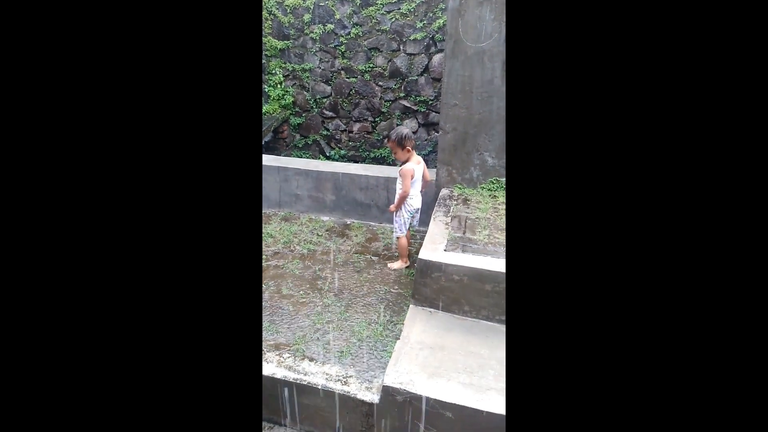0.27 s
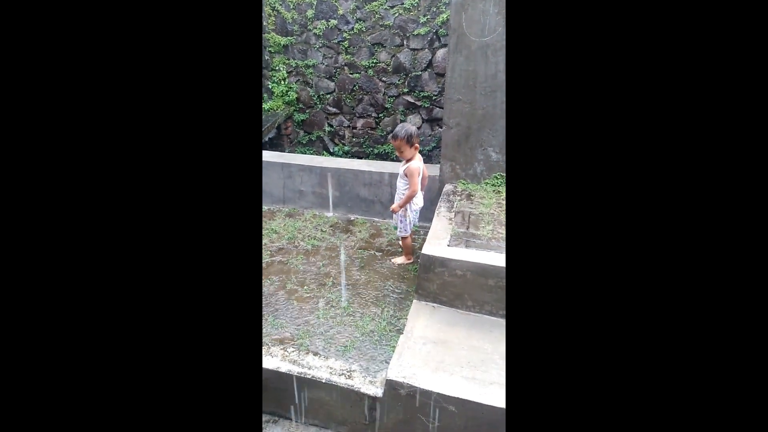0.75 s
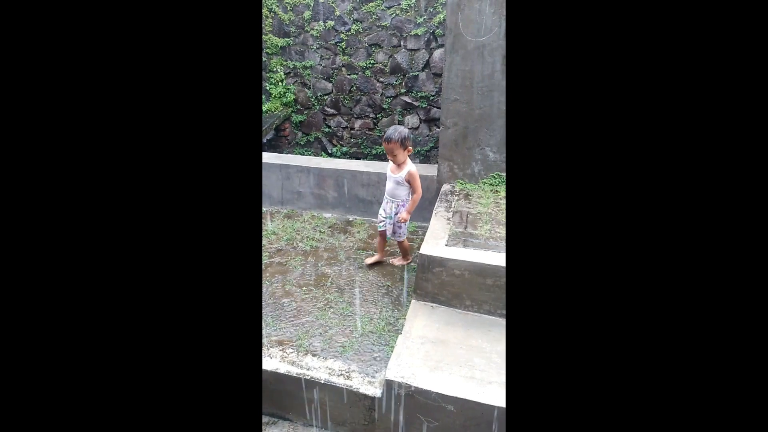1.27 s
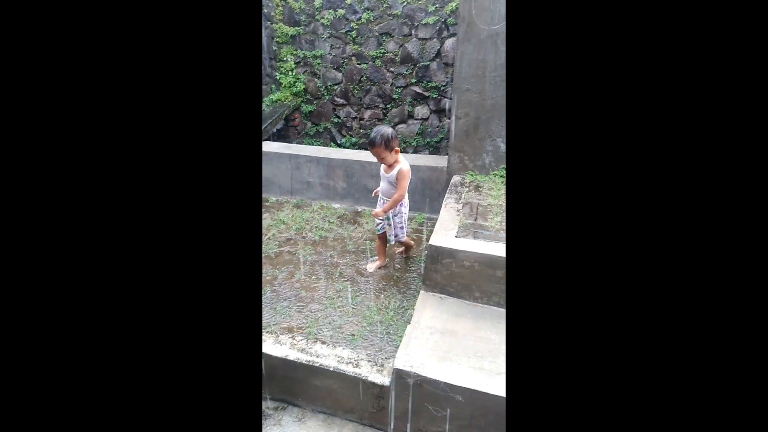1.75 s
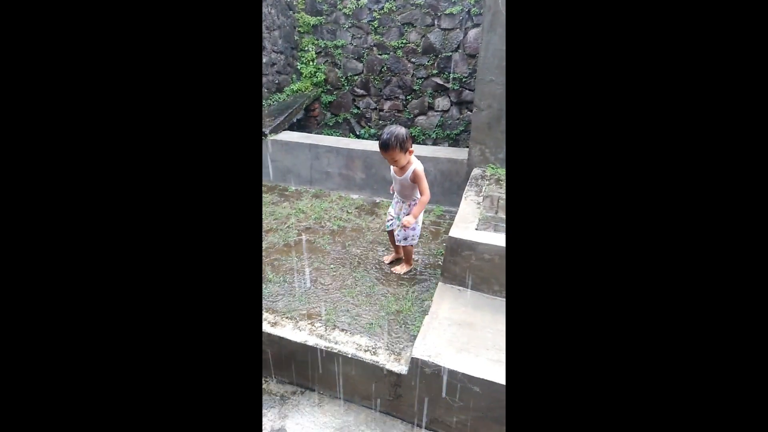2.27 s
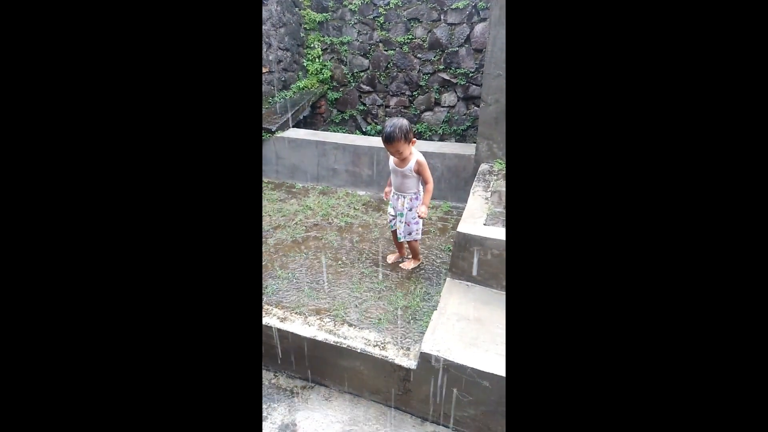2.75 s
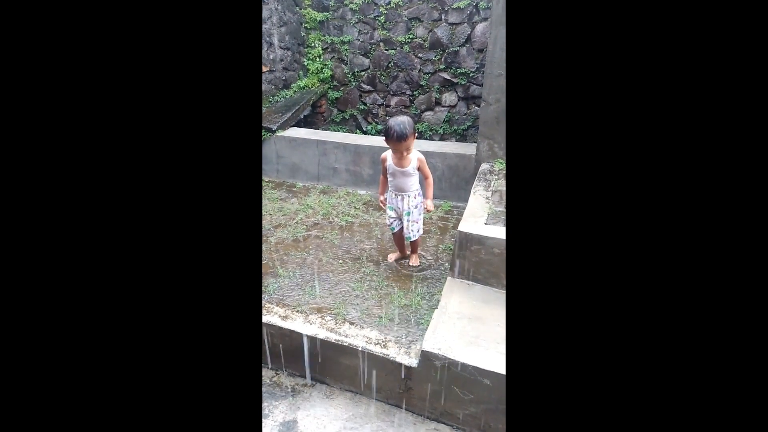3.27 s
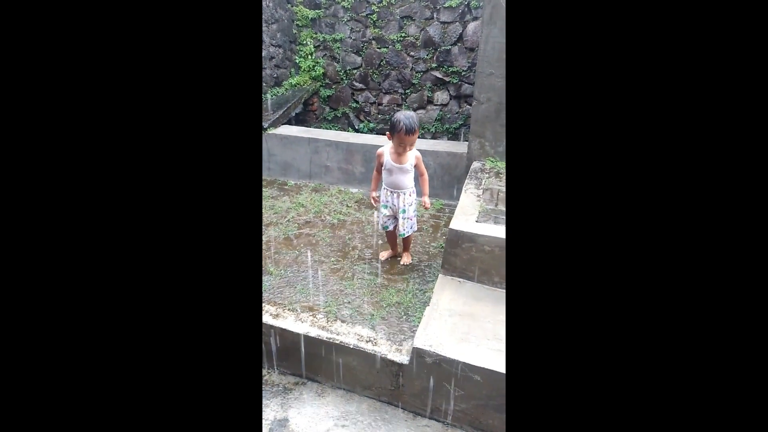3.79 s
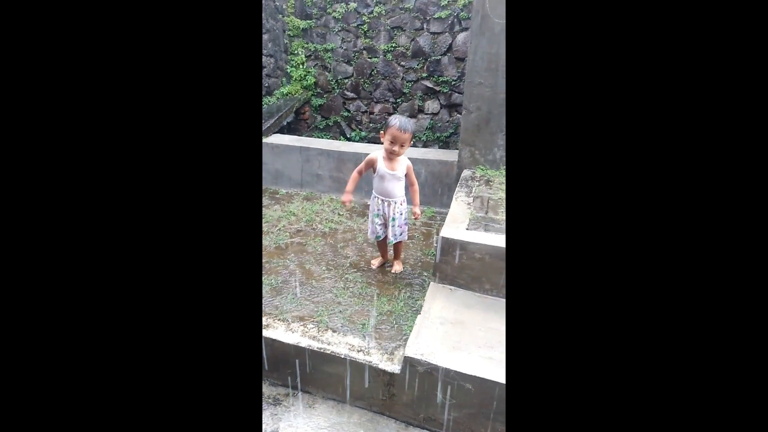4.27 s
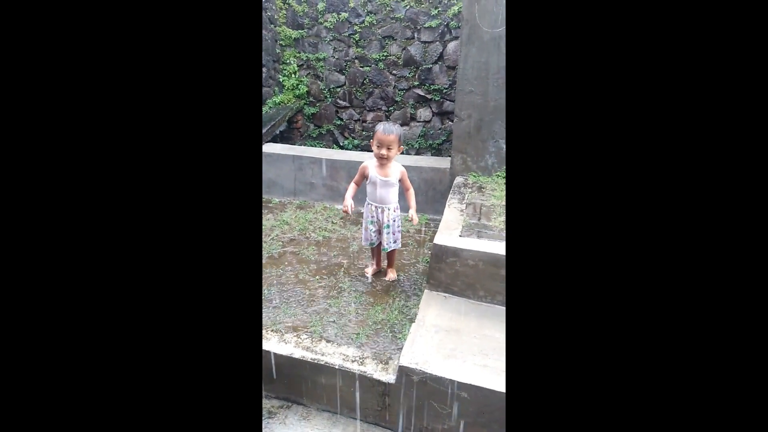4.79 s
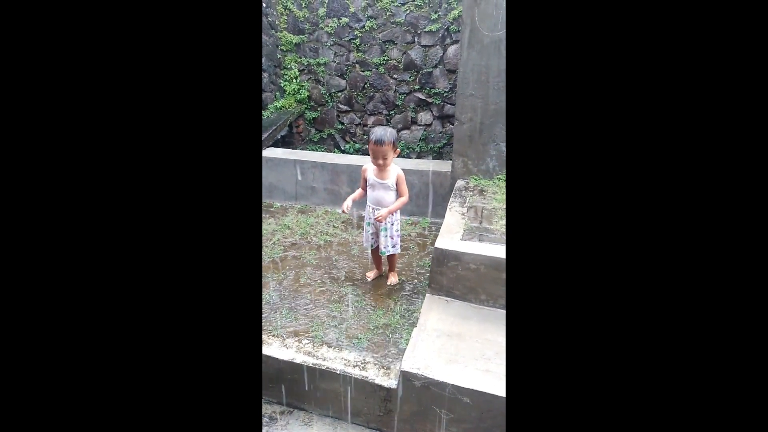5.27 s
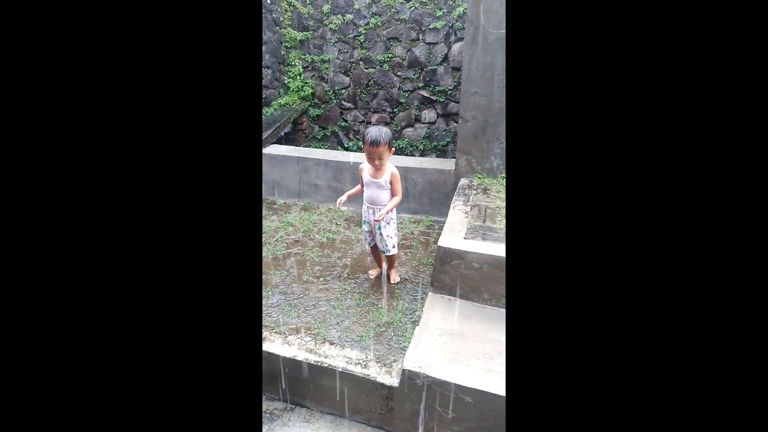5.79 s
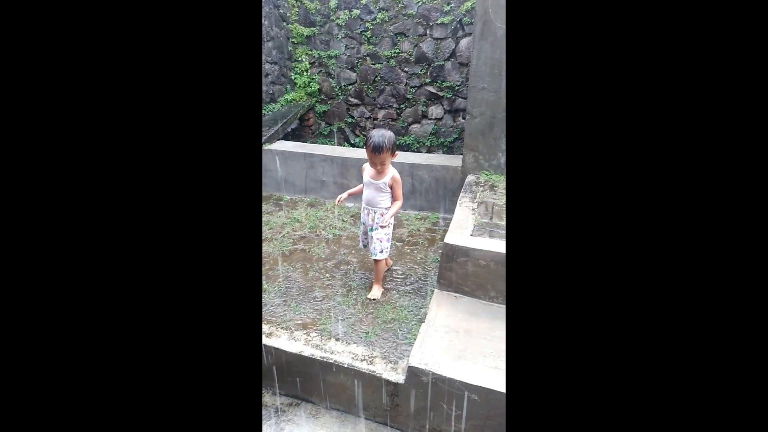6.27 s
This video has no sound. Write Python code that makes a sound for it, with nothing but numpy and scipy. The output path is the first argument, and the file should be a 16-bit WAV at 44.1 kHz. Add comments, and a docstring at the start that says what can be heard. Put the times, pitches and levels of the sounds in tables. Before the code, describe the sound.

Rainwater pours from the eaves and splashes brightly on a concrete slab, briefly letting up, while rain hisses farther off.

```python
"""Run-off from a roof splatters on concrete in uneven gushes: heavy rain in a walled yard, heard from
under the eaves. Clots of water land flat and big drops smack into the film on the slab, trapping
bubbles that ring briefly, and the walls answer. Far rain hisses over a low rumble. The gushes almost
stop just after two seconds, then build again; three faint tones sound far off near the end.
The splatter is brightest at 3-6 kHz, and the sound is wide only in the treble."""
import sys
import numpy as np
from scipy import signal
from scipy.fft import rfft, irfft, next_fast_len
from scipy.io import wavfile
from scipy.ndimage import uniform_filter1d, minimum_filter1d, map_coordinates

SR = 44100
rng = np.random.default_rng(int(sys.argv[2]) if len(sys.argv) > 2 else 0)


def int16_out(signal):
    """Quantize to a 16-bit WAV file."""
    q = np.round(np.clip(np.atleast_2d(signal).T, -1, 1) * 32767)
    wavfile.write(sys.argv[1], SR, q.astype(np.int16))


N = 288414


def amp(db):
    """Turn dB into gain."""
    return 10 ** (np.asarray(db) / 20)


def unit(x):
    """Scale to rms 1."""
    return x / np.sqrt(np.mean(x ** 2) + 1e-20)


def along(points, hz):
    """Read (Hz, value) points at hz, on a log frequency axis."""
    knots_hz, values = np.transpose(points)
    return np.interp(np.log(hz + 1), np.log(knots_hz + 1), values)


def automation(rows):
    """One curve, sample by sample, for each column after the time."""
    times, *columns = np.transpose(rows)
    return [np.interp(np.arange(N) / SR, times, column) for column in columns]


def wobble(rate):
    """A smooth random curve with rate knots a second."""
    return map_coordinates(rng.standard_normal(int(N * rate / SR) + 4), [np.arange(N) * rate / SR])


def eq(x, points):
    """Shape x with a curve of (Hz, dB) points."""
    size = next_fast_len(N + 8192)
    gain = amp(along(points, np.fft.rfftfreq(size, 1 / SR)))
    return irfft(rfft(x, size) * gain, size)[..., :N]


def hiss(patchy_db):
    """Mid and side noise, louder and softer in random patches of time and frequency."""
    spectrum = signal.stft(rng.standard_normal((2, N)), nperseg=512)[2]
    patches = uniform_filter1d(rng.standard_normal(spectrum.shape[1:]), 6, axis=0)
    patches = unit(uniform_filter1d(patches, 8, axis=1))
    return unit(signal.istft(spectrum * amp(patchy_db * patches), nperseg=512)[1][:, :N])


def bubbles(starts, gain, hz, t60, rise, samples):
    """Trapped bubbles ring as damped, rising sines, each left or right at random; gives mid and side."""
    t = np.arange(samples) / SR
    draw = rng.random((len(starts), 2))
    life = t / np.maximum(t60, 1e-4)[:, None]
    phase = 2 * np.pi * (hz[:, None] * t * (1 + rise * np.minimum(life, 1)) + draw[:, :1])
    attack = 1 - np.exp(-t * hz[:, None] / 0.8)  # swells over about a cycle
    ring = gain[:, None] * amp(-60 * life) * attack * np.sin(phase)
    at = (np.round(starts * SR).astype(int)[:, None] + np.arange(samples)).ravel()
    pan = np.sign(draw[:, 1:] - .5)
    return np.array([np.bincount(at, wave.ravel(), N + SR)[:N] for wave in (ring, ring * pan)])


def patter(starts, heft, pitch_hz, spread, cycles, heft_db, samples, share):
    """Small drops ring around pitch_hz on a bed of hiss; share is the drops' part of the power."""
    detune = np.exp(spread * rng.standard_normal(len(starts)))
    hz = np.clip(pitch_hz[(starts * SR).astype(int)] * detune, 300, 17000)
    drops = unit(bubbles(starts, amp(heft_db * heft), hz, cycles / hz, rise=0.296, samples=samples))
    return np.sqrt(share) * drops + np.sqrt(1 - share) * hiss(patchy_db=1.5)


# The gushes off the roof. Each row: time in seconds, splatter level in dB, spray level in dB.
GUSHES = [(0, -28, -31.5), (0.12, -26, -35), (0.58, -28.5, -35.5), (0.7, -23.5, -35.5), (0.93, -28.5, -38),
          (1.0, -26, -35.5), (1.2, -26, -38.5), (1.44, -41, -41.5), (1.5, -31, -36), (1.62, -31, -38),
          (1.7, -37.5, -40), (1.9, -34.5, -40), (1.96, -34.5, -34), (2.07, -29, -45), (2.11, -44.5, -43),
          (2.2, -65, -55), (2.275, -60, -50), (2.3, -36, -39), (2.52, -42, -37), (2.55, -29.5, -36),
          (2.75, -24, -36.5), (3.3, -22.5, -39), (3.45, -27.5, -38.5), (3.7, -20.5, -38.5),
          (3.87, -22.5, -35), (3.95, -25, -38), (4.12, -22.5, -35), (4.26, -25, -37), (4.42, -21.5, -35.5),
          (4.52, -23.5, -38), (4.71, -18, -35.5), (4.82, -24, -34), (4.92, -20, -35.5), (5.28, -26.5, -34),
          (5.36, -22, -33.5), (5.62, -22, -35), (5.8, -19, -36), (6.18, -23, -32), (6.33, -20.5, -35),
          (6.54, -21.5, -35.5)]
# The typical bubble in the run-off. Each row: time in seconds, pitch in Hz.
BUBBLE_PITCH = [(0, 4285), (2.2, 4310), (2.7, 4740), (4.4, 4960), (5.5, 5290), (6.54, 5300)]
# The colours of bright splatter, lower wash and airy spray. Each row: frequency in Hz, gain in dB.
SPLATTER_EQ = [(1500, -33), (2500, -22), (3300, -7), (4200, -1.5), (5100, 1), (5900, -3.5), (7000, -16.5),
               (10000, -18)]
WASH_EQ = [(700, -31), (1300, -11), (1900, -12.5), (2600, 1), (3300, 6), (4500, -31)]
SPRAY_EQ = [(4500, -6), (6500, -1), (8000, 0), (10500, -1.5), (14000, -0.5), (16000, -7)]


def run_off():
    """Roof water hits the slab: one stream of drops sounds as splatter, wash and spray at once."""
    flow_db, spray_db = automation(GUSHES)
    surge = after_clots(db=-12.5, t60=0.34)  # splatter thrown up by each clot
    splatter_db = 10 * np.log10(amp(2 * flow_db) + surge)
    surge_share = 1 - amp(2 * (flow_db - splatter_db))
    hz = automation(BUBBLE_PITCH)[0] * (1 - 0.2 * surge_share)  # fresh water traps bigger bubbles
    flutter = wobble(45) + 1.3 * wobble(110)
    starts = rng.random(size=6000) * (N - 1) / SR
    heft = np.minimum(rng.exponential(size=6000), 4)

    wet = patter(starts, heft, hz, spread=0.2185, cycles=47, heft_db=2.5, samples=384, share=0.24)
    bright = np.clip((hz - 3700) / 1800, 0, 1)  # smaller bubbles shift the whole colour up
    low, high = (unit(eq(wet, np.multiply(SPLATTER_EQ, [shift, 1]))) for shift in (.88, 1.1))
    splatter = unit((1 - bright) * low + bright * high) * amp(splatter_db + 0.91 * flutter)

    wash = patter(starts[::3], heft[::3], 0.447 * hz,
                  spread=0.28, cycles=24, heft_db=0, samples=384, share=0.16)
    spray = patter(starts, heft, 2.43 * hz,
                   spread=0.33, cycles=74, heft_db=7.5, samples=160, share=0.099)
    wash_gain = np.sqrt(after_clots(db=-20, t60=0.96)) * amp(1.9 * flutter + 0.66 * wobble(40))
    spray_gain = amp(spray_db + 1.14 * flutter + 0.51 * wobble(40))
    return splatter + wash_gain * unit(eq(wash, WASH_EQ)) + spray_gain * unit(eq(spray, SPRAY_EQ))


# The colours of the far rain and the rumble under it. Each row: frequency in Hz, gain in dB.
RAIN_EQ = [(100, -20), (150, -5), (300, -4), (600, -2.5), (1000, -4.5), (1600, -9), (4000, -6.5),
           (6000, -27), (16000, -18.5)]
RUMBLE_EQ = [(15, -48), (25, -38), (63, 6.5), (80, 6.5), (98, 7), (124, -11), (140, 1.5), (180, -6.5),
             (310, -120)]
# The swell and ebb of the rumble. Each row: time in seconds, level in dB.
RUMBLE_SWELLS = [(0.0, -52), (0.07, -52.5), (1.38, -43.5), (1.6, -51), (2.2, -46.5), (2.26, -58.5),
                 (3.71, -46), (4.86, -54.5), (6.52, -53), (6.54, -46)]


def far_rain():
    """Countless distant drops merge into a smooth hiss over a rumble."""
    flow_db, full_flow_db = automation(GUSHES)[0], -23
    rain_db = -43 + 0.11 * (flow_db - full_flow_db)  # rides gently with the gushes
    rumble_db = automation(RUMBLE_SWELLS)[0]
    rain = amp(rain_db + 0.73 * wobble(11)) * unit(eq(hiss(patchy_db=2.5), RAIN_EQ))
    rumble = amp(rumble_db + wobble(9.3)) * unit(eq(hiss(patchy_db=2.5), RUMBLE_EQ))
    return rain + rumble


# A thin film of water radiates no bass. Each row: frequency in Hz, gain in dB.
FILM_EQ = [(700, -44), (1500, 2.5), (16000, 4)]


def smacks(starts, db, hz, cycles, spread, span, count):
    """Each hit on the water film traps a cluster of bubbles, tailing off over about span seconds."""
    detune, delay, scatter = np.moveaxis(rng.standard_normal((len(starts), count, 3)), -1, 0)
    pitch = (hz[:, None] * np.exp(spread * detune)).ravel()
    late = np.abs(delay) * np.arange(count) / count
    onsets = (starts[:, None] + span * late).ravel()
    gain = amp(db[:, None] - 10 * np.log10(count) - 1.4 * late + 0.49 * scatter).ravel()
    return eq(bubbles(onsets, gain, pitch, cycles / pitch, rise=0.091, samples=768), FILM_EQ)


# Clots of water landing flat. Each row: start in seconds, level in dB, pitch in Hz.
CLOTS = [(0.0094, -8, 2290), (0.451, -21.5, 1980), (0.648, -17.5, 2380), (1.1064, -11.5, 2440),
         (1.257, -16, 2480), (1.388, -23.5, 1750), (1.507, -19.5, 2110), (1.921, -22, 2120),
         (1.948, -16, 2450), (2.4324, -21, 2150), (2.5436, -16.5, 2320), (2.8, -18, 2500),
         (3.0986, -14, 2180), (3.34, -17.5, 2600), (3.458, -12.5, 2300), (3.68, -11, 2850),
         (3.7479, -12, 2700), (3.835, -17.5, 2280), (4.139, -20, 2580), (4.283, -18.5, 3000),
         (4.3994, -17.5, 2800), (4.64, -18.5, 2860), (4.864, -24, 2100), (5.2367, -15.5, 2420),
         (5.3137, -12, 2680), (5.646, -10, 2360), (5.902, -13, 2630), (6.4816, -12, 2540),
         (6.5145, -16, 2050)]


def clots():
    """A clot of water slaps down, lower than a single drop, and splashes on for a moment."""
    starts, db, hz = np.transpose(CLOTS)
    slap = smacks(starts, db, hz, cycles=26, spread=0.09, span=0.0015, count=6)
    splash = smacks(starts + 0.0097, db - 11, hz, cycles=67, spread=0.16, span=0.037, count=24)
    return slap + splash


def after_clots(db, t60):
    """A power envelope that jumps at each clot, db relative to its level, and dies in t60 seconds."""
    starts, clot_db, _ = np.transpose(CLOTS)
    kicks = np.bincount((starts * SR).astype(int), amp(2 * (clot_db + db)), N)[:N]
    return np.abs(signal.lfilter([1], [1, -amp(-120 / (t60 * SR))], kicks))


# Single big drops. Each row: start in seconds, level in dB, bubble pitch in Hz, crack offset in dB.
BIG_DROPS = [(0.097, -10, 3700, -18), (0.2101, 4, 4520, -25), (0.2552, -8.5, 4700, -22),
             (0.3268, -13, 3500, -24), (0.531, -7.5, 4830, -19), (0.584, -14.5, 5070, -20),
             (0.6898, -8.5, 3830, -23), (0.7102, -4, 4970, -26), (0.8897, -6, 4900, -25),
             (0.9614, -5, 4280, -22), (0.991, -9.5, 3830, -22), (1.0093, 5, 4250, -27),
             (1.0869, -15, 3800, -30), (1.1064, -8, 3090, -30), (1.1275, 3, 4500, -15),
             (1.3136, -12.5, 4530, -7), (1.355, -12, 3340, -27), (1.4805, -15, 3830, -16),
             (1.508, -7, 4420, -6), (1.5687, -15, 3870, -5), (1.5923, -9.5, 4600, -25),
             (1.923, -7, 5000, -18), (1.949, -1.5, 3820, -29), (2.0243, -12, 4360, -27),
             (2.0769, -13.5, 4010, -26), (2.1435, -63, 2930, -15), (2.1894, -35, 3700, -17),
             (2.2228, -40, 3320, -26), (2.2598, -35, 2810, -13), (2.277, -28, 3940, 4),
             (2.296, -18.5, 2830, -13), (2.327, -18, 3040, -19), (2.4424, -17.5, 5740, -18),
             (2.4622, -22, 3180, -8), (2.4907, -19, 5500, -8), (2.5436, -8.5, 4130, -27),
             (2.595, -11, 4380, -15), (2.614, -4.5, 5370, -4), (2.6477, -8, 4200, -27),
             (2.6947, -2, 4700, -28), (2.8005, -8.5, 5300, -26), (2.8589, -1, 4240, -18),
             (2.9212, -2, 4300, -26), (3.1572, -7, 4960, -23), (3.2675, -4.5, 4420, -31),
             (3.3394, 2, 4170, -16), (3.457, 2.5, 4660, -7.5), (3.6793, -10, 4930, -28),
             (3.7182, -7, 4030, -27), (3.7479, -2, 4370, -16), (3.8347, 1, 4860, -26),
             (3.8604, -5, 4950, -23), (3.877, 0, 3630, -16), (4.064, -8, 4980, -23),
             (4.2822, -1, 4420, -20), (4.321, -5, 4770, -21), (4.3984, -4, 3600, -31),
             (4.4076, -4, 4720, -29), (4.4174, -2, 4470, -31), (4.5137, -10.5, 5400, -33),
             (4.567, -6, 5140, -28), (4.61, -8, 5300, -35), (4.6269, -6, 5560, -25),
             (4.6412, -1, 3930, -25), (4.767, -12, 4700, -22), (4.789, 2, 5670, -20),
             (4.8942, 10.5, 4840, -26), (4.9222, 5, 4570, -27), (5.2346, -7, 4800, -24),
             (5.3145, -7.5, 4150, -26), (5.3687, -4.5, 4660, -5.5), (5.392, 1, 4700, -25),
             (5.4861, -2.5, 4400, -12), (5.5243, 2.5, 4260, -15), (5.6461, -9, 5030, -27),
             (5.6767, -13, 4000, -21), (5.7018, -4, 5540, -26), (5.7553, -6, 5390, -28),
             (5.8133, 7, 4870, -24), (5.904, -15, 5560, -30), (5.9167, -10, 5050, -29),
             (5.9616, -4, 5360, -31), (6.0125, -5, 5340, -22), (6.126, -1, 4990, -27),
             (6.221, 1.5, 5300, -17), (6.2845, 0.5, 4180, -6.5), (6.344, 0, 5220, -28),
             (6.4128, -18, 5300, -28), (6.4817, -3.5, 4580, -26), (6.5165, -6, 4400, -22)]


def big_drops():
    """A drop splats on first contact, cracks on the slab and rings with the bubbles it traps."""
    starts, db, hz, crack_db = np.transpose(BIG_DROPS)
    crack_hz = np.full_like(hz, 10500)
    ring = smacks(starts, db, hz, cycles=40, spread=.12, span=.0022, count=8)
    splat = smacks(starts, db - 9, hz, cycles=13.2, spread=.26, span=.00045, count=6)
    crack = smacks(starts, db + crack_db, crack_hz, cycles=22, spread=.33, span=.0012, count=8)
    return ring + splat + crack


# The reverb of the yard. Each row: frequency in Hz, time to fall 60 dB in seconds.
YARD_DECAY = [(1000, 0.99), (4000, 0.2), (12000, 0.026)]


def walls(x):
    """The yard walls answer with a tail whose treble dies first."""
    hz, t, spectrum = signal.stft(rng.standard_normal((2, SR // 4)), SR, nperseg=256)
    decay = amp(-60 * t / along(YARD_DECAY, hz)[:, None])
    tail = signal.istft(spectrum * decay, SR, nperseg=256)[1]
    delayed = np.pad(x, ((0, 0), (300, 0)))  # about 7 ms of pre-delay
    return signal.fftconvolve(delayed, tail / np.linalg.norm(tail[0]), axes=1)[:, :N]


# Faint held tones far off. Each row: start in seconds, length in seconds, pitch in Hz, level in dB.
FAR_TONES = [(5.316, 0.38, 1053, -53.5), (6.202, 0.057, 308, -46.5), (6.336, 0.14, 306, -48.5)]


def faint_tones(fade_s=0.022):
    """Slightly unsteady sines fade in, hold and fade out."""
    t, out = np.arange(N) / SR, 0
    for start, length, hz, db in FAR_TONES:
        fade = np.clip(np.minimum(t - start, start + length - t) / fade_s + .5, 0, 1)
        gain = np.sqrt(2) * amp(db + 1.8 * wobble(28))
        phase = 2 * np.pi * np.cumsum(hz + 4.9 * wobble(25)) / SR
        out = out + fade * gain * np.sin(phase)
    return out


# The stereo image, wide only in the treble. Each row: frequency in Hz, side gain in dB.
SIDE_EQ = [(3000, -95), (3500, -58), (4100, -20), (5500, -13), (7200, -7), (8200, -4), (15000, -4)]


def scene():
    """Mix in mid and side, with reverb on the big drops and clots, then turn to left and right."""
    hits = big_drops() + clots()
    mid, side = run_off() + hits + amp(-10) * walls(hits) + far_rain()
    side = eq(side, SIDE_EQ)
    mid = mid + faint_tones()
    return np.array([mid + side, mid - side])


# The microphone's steep treble roll-off. Each row: frequency in Hz, gain in dB.
MIC_ROLL_OFF = [(14330, 0), (14480, -52), (15600, -70)]


def record(dry):
    """The microphone rolls off, a quick stereo-linked limiter holds the peaks, and the top is cut."""
    ceiling, window, top_hz = .8, int(.003 * SR), 15612
    heard = eq(dry, MIC_ROLL_OFF)
    needed = np.minimum(1, ceiling / (np.abs(heard).max(axis=0) + 1e-9))
    held = minimum_filter1d(needed, window)  # looks ahead of each peak
    gain = uniform_filter1d(uniform_filter1d(held, window // 2), window // 2)
    size = next_fast_len(N + 8192)
    passband = np.fft.rfftfreq(size, 1 / SR) < top_hz
    return irfft(rfft(heard * gain, size) * passband, size)[:, :N]


dry = scene()
out = record(dry)
int16_out(out)
```